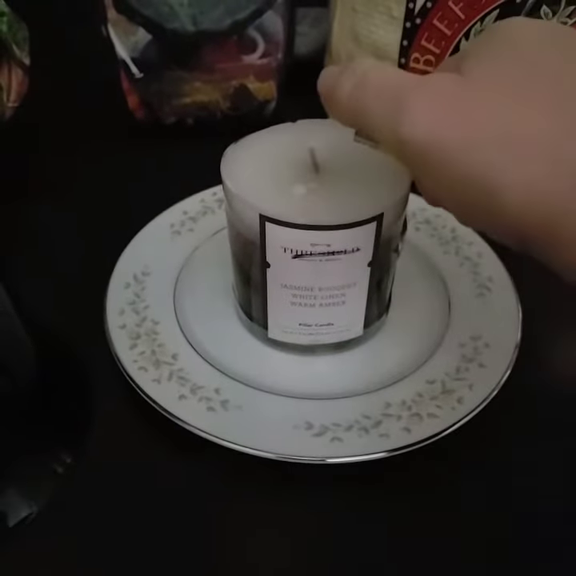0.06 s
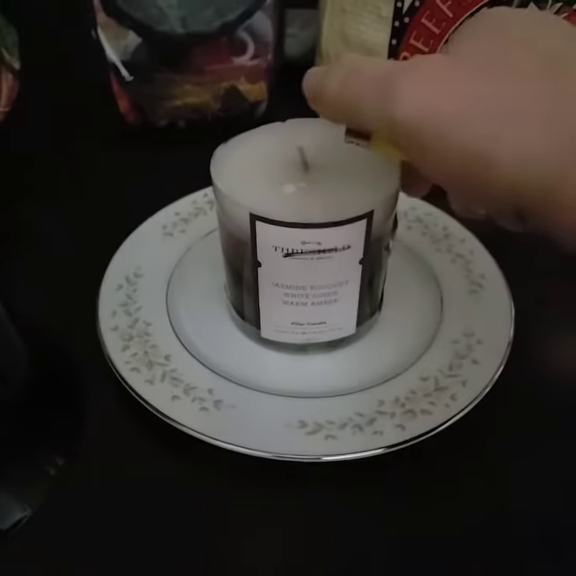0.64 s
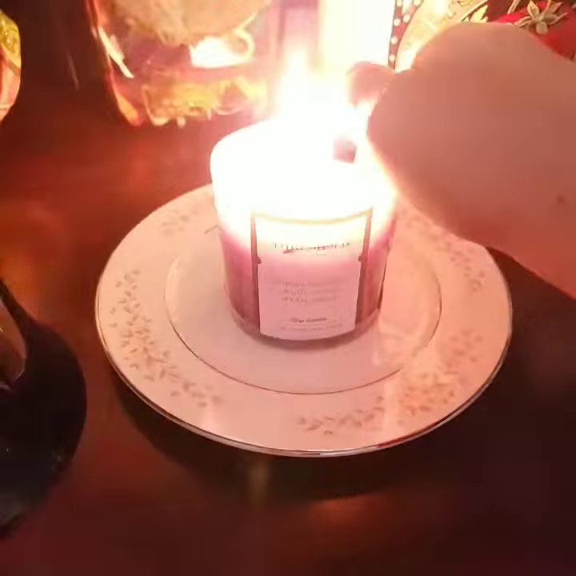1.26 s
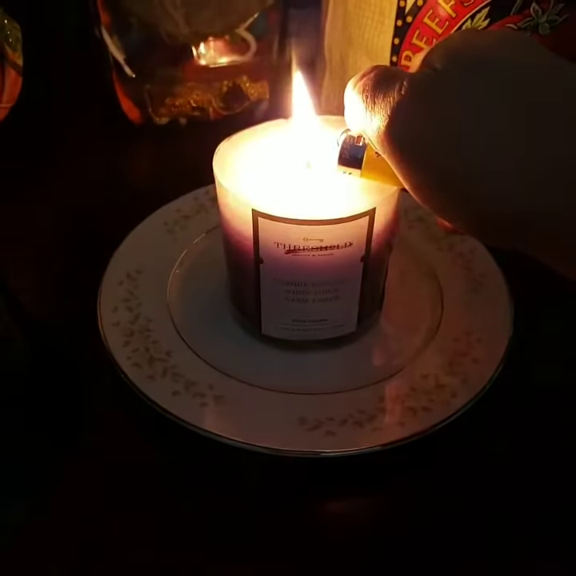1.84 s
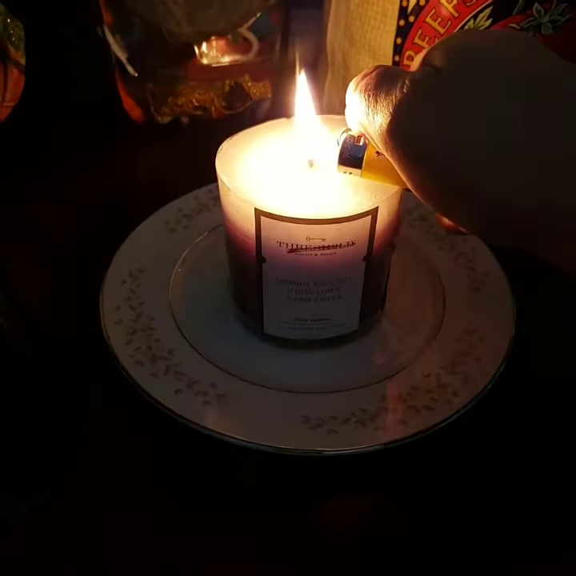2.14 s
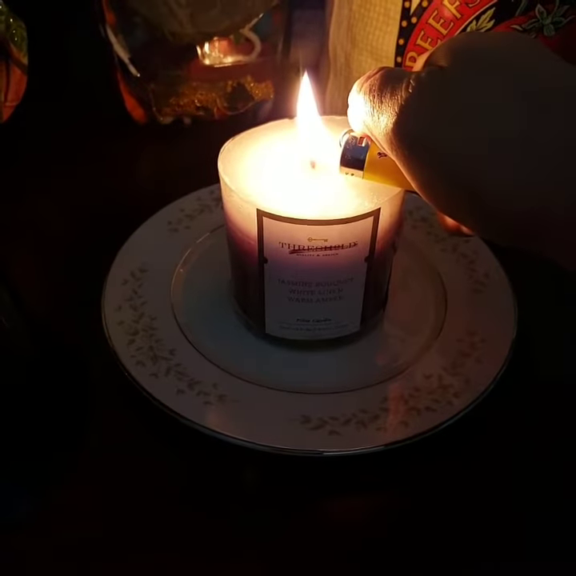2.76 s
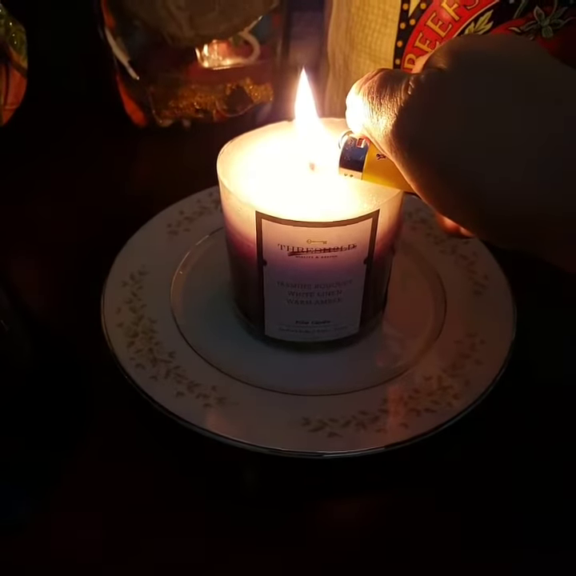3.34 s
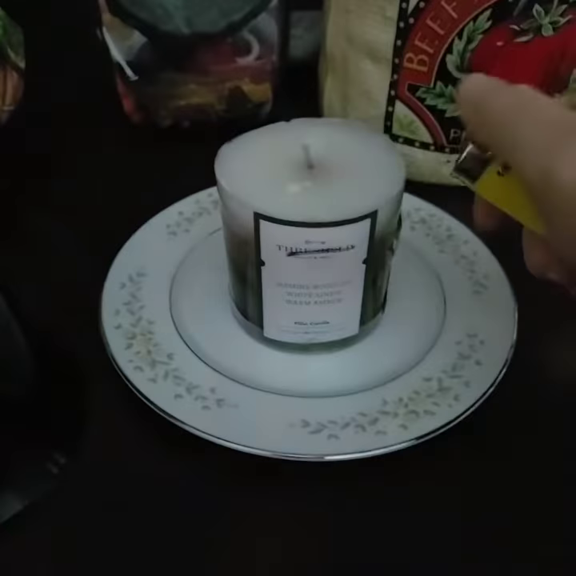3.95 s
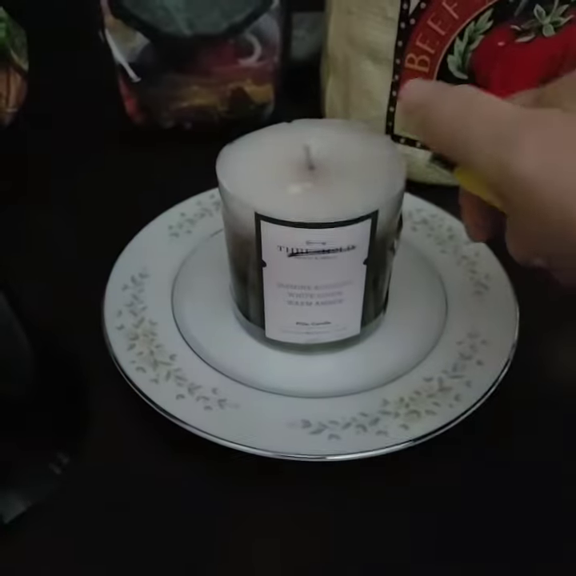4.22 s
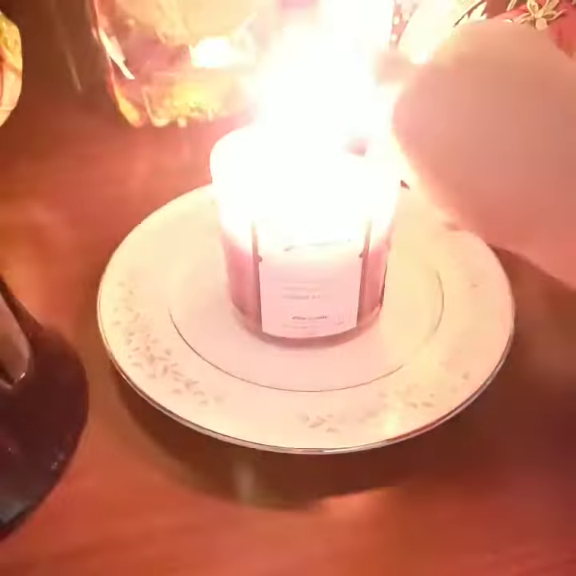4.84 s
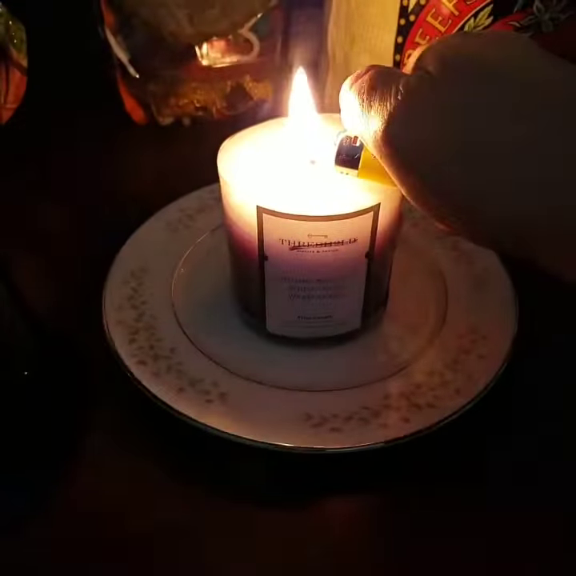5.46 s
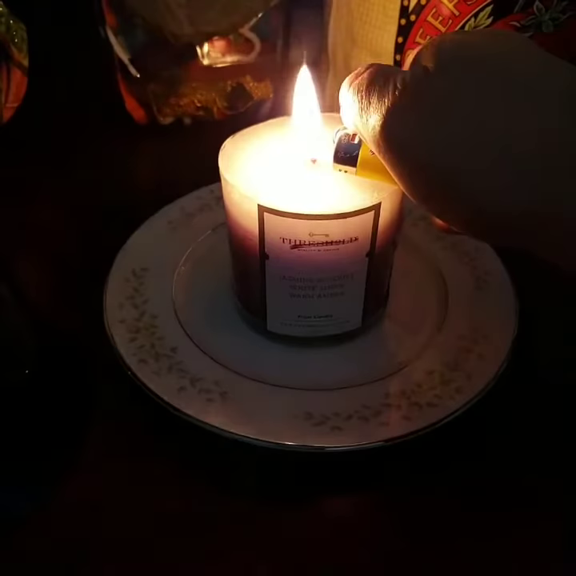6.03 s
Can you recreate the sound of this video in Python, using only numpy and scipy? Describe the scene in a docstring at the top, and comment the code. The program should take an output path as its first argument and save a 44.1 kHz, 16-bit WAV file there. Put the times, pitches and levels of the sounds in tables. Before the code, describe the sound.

A disposable lighter is struck twice up close, each short, sharp rasp followed by a faint gas hiss in a quiet room.

```python
"""In a small, quiet room, a disposable flint lighter is struck twice over a candle, close to a phone.
The wheel grinds on the flint and rings the metal hood, the thumb lands on the gas lever,
gas hisses and whistles from the nozzle, and the young flame flutters.
A low hum wavers underneath, and the left microphone hisses in its port resonance."""
import sys
import numpy as np
from scipy import signal
from scipy.fft import rfft, irfft, next_fast_len
from scipy.io import wavfile
from scipy.ndimage import uniform_filter1d

SR = 44100
rng = np.random.default_rng(int(sys.argv[2]) if len(sys.argv) > 2 else 0)


def wav_record(signal):
    """Record a signal, one row per channel, as 16-bit PCM in the file named by sys.argv[1]."""
    frames = np.transpose(np.atleast_2d(signal))
    bounded = np.clip(frames, -1, 1)
    # unit amplitude maps onto the largest positive 16-bit level
    quanta = np.round(bounded * 32767).astype(np.int16)
    wavfile.write(sys.argv[1], SR, quanta)


N = 268392
TIME = np.arange(N) / SR

# single snaps of wheel and lever: t/s, relative level/dB
SNAPS = [(0.335, -50), (0.348, -56), (0.884, -55), (0.939, -59), (1.061, -35), (1.078, -24.5),
         (1.183, -52.5), (1.213, -56), (1.26, -24), (1.294, -30), (1.338, -41), (1.345, -52),
         (2.365, -35.5), (3.588, -47), (3.624, -44.5), (4.803, -57.5), (5.101, -48), (5.136, -55),
         (5.205, -34.5), (5.963, -52), (6.05, -52)]
# thin, bright EQ of a snap: f/Hz, level/dB
SNAP_EQ = [(500, -2.5), (2000, -8), (4000, -12.5), (6500, 0), (16000, 5.5)]
# EQ of the slow rasp against the free spin: f/Hz, level/dB
RASP_EQ = [(1500, -4), (2800, 4), (4300, -4.5), (5600, 0), (8500, -2), (12000, 0), (16000, -0.5)]
# EQ of the left microphone against the right: f/Hz, level/dB
LEFT_EQ = [(100, -3.5), (700, -4.5), (1300, 6), (1800, 15), (2500, 5), (4000, 1.5), (5200, -8), (8000, -4),
           (11000, -9.5), (15000, -7.5)]

def wheel(snap_s=0.00059, snap_db=3, left_lag_samples=30):
    """Teeth tear grains off the flint: a gritty rasp when slow, a dense burst when fast, snaps on top."""
    rasp, spin = friction()
    speed = np.sqrt((rasp + spin) / np.max(rasp + spin))
    teeth_hz = (250 + 2200 * speed) * np.exp(.3 * drift(500))
    tooth_phase = np.cumsum(teeth_hz) / SR % 1
    grains = rng.standard_normal(N) * np.exp(-1.3 * tooth_phase) * undb(1.5 * drift(5000))
    grit = unit(grains) * undb(2.2 * drift(300))
    blur = unit(rng.standard_normal(N) * np.exp(-.7 * tooth_phase))
    snap_envelope = sum(undb(db + snap_db) * gate(t, t, .0001, snap_s) for t, db in SNAPS)
    snaps = colour(snap_envelope * rng.standard_normal(N), SNAP_EQ)
    right = hood(colour(rasp * grit, RASP_EQ) + spin * blur + snaps)
    # the left microphone lies further off, at the other end of the phone
    left = colour(np.roll(right, left_lag_samples), LEFT_EQ)
    return np.array([room(left, near_db=-2.5, tail_db=-8.0), room(right, near_db=-10.5, tail_db=-14.5)])


# the thumb feels for grip and nudges the wheel: start t/s, end t/s, level reached/dB
GRIP_RUBS = [(0.341, 0.379, -67), (.893, 0.943, -53.5), (0.947, 0.988, -59.5), (1.007, 1.078, -47),
             (1.202, 1.227, -46), (3.563, 3.61, -63), (5.101, 5.14, -67.5), (5.949, 5.981, -67.5)]
# the thumb strikes the wheel: grip t/s, slip t/s, grip level/dB, spin level/dB, spin half length/s
WHEEL_STRIKES = [(1.239, 1.273, -41, -17.5, .0062), (4.858, 4.928, -54.5, -13.5, .003)]

def friction(swell_db=12.5, slip_db=-30.5, coast_s=.02, tail_db=-7, tail_s=.008):
    """Rasp and spin envelopes: rubs swell and let go; a strike builds, slips and coasts to rest."""
    rasp, spin = np.zeros((2, N))
    for start, end, db in GRIP_RUBS:
        swell = undb(db + np.interp(TIME, [start, end], [-swell_db, 0]))
        rasp += swell * gate(start, end, 0.0065, .011)
    for grip, slip, grip_db, spin_db, spin_s in WHEEL_STRIKES:
        build = undb(np.interp(TIME, [grip, slip], [grip_db, slip_db]))
        rasp += build * gate(grip, slip, .001, coast_s)
        burst = np.exp(-.5 * ((TIME - slip) / spin_s) ** 2)
        tail = undb(tail_db) * gate(slip, slip, .001, tail_s)
        spin += undb(spin_db) * np.maximum(burst, tail)
    return rasp, spin


# metallic rings of hood and wheel: f/Hz, width/Hz, level/dB
HOOD_MODES = [(2660, 74, -5.5), (4800, 470, -6), (5940, 80, 1.5), (6280, 36, -6.5), (6530, 50, -2),
              (7800, 92, 10), (9530, 130, 0), (11100, 210, -0.5), (11740, 190, 0), (12300, 45, 2),
              (13260, 200, -1), (13800, 310, -2), (14000, 72, 3.5), (14700, 50, -0.5)]
# EQ of the grinding flint: f/Hz, level/dB
FLINT_EQ = [(100, -25), (400, -18), (750, -17), (1400, -21.5), (2300, -11), (3200, -4.5), (4000, -9),
            (5000, -0.5), (6200, -4), (7000, -4), (9200, -6), (11000, -1.5), (13500, 1.5), (16000, 0)]

def hood(contact):
    """The bare contact noise plus the ringing it excites in the metal parts."""
    impulse = signal.unit_impulse(N)
    rings = sum(undb(db) * signal.lfilter(*signal.iirpeak(hz, hz / width, fs=SR), impulse)
                for hz, width, db in HOOD_MODES)
    response = colour(impulse + rings, FLINT_EQ)[:SR // 5]
    return signal.fftconvolve(contact, response / np.linalg.norm(response))[:N]


# the thumb lands on the lever and jolts the case: t/s, level/dB, decay/s
THUDS = [(1.078, -60.5, 0.01), (1.27, -49.5, 0.013), (1.288, -36, 0.017), (2.366, -57, 0.016),
         (4.929, -48.5, 0.03), (4.948, -49.5, 0.015)]
# dull EQ of the plastic case: f/Hz, level/dB
CASE_EQ = [(30, -12), (70, -1.5), (125, 4.5), (180, -0.5), (310, -6), (400, -15.5), (470, -6.5), (560, -15),
           (750, -24), (1500, -33), (4000, -54.5)]
# the body knocks in the hand: t/s, level/dB, f/Hz, decay/s
CASE_KNOCKS = [(0.906, -66, 850, 0.036), (1.078, -55, 1360, 0.0079), (1.292, -34.5, 1915, 0.0046),
               (2.363, -61, 880, 0.0056), (2.366, -63, 2900, 0.0035), (3.586, -57, 2770, 0.0063),
               (4.928, -53, 1900, 0.0038)]

def thumb(knock_q=2.5):
    """Dull thuds and small hollow knocks of the case, damped by the hand."""
    thud_envelope = sum(undb(db) * gate(t, t, 0.0025, decay) for t, db, decay in THUDS)
    knocks = 0
    for t, db, hz, decay in CASE_KNOCKS:
        knocks += undb(db) * gate(t, t, 0.0014, decay) * band_noise(hz, hz / knock_q, order=2)
    return pan(thud_envelope * noise(CASE_EQ), left_db=3.0) + pan(knocks, left_db=2.5)


# flutters of the young flame: t/s, length/s, level/dB, rush against flutter/dB
FLAME_FLUTTERS = [(1.386, 0.063, -60, -20), (1.522, 0.11, -61.5, 6), (1.733, 0.045, -55.5, -35),
                  (5.155, 0.068, -67.5, -9), (5.476, 0.032, -68, -26)]
# EQ of the low flutter: f/Hz, level/dB
FLUTTER_EQ = [(100, -36), (170, -10), (235, 2.5), (285, 0.5), (350, -5), (520, -4.5), (700, -15.5),
              (950, -29), (2000, -49)]
# EQ of the airy rush: f/Hz, level/dB
RUSH_EQ = [(200, -21), (450, 3), (900, -5), (1600, -3), (3000, -12.5), (5000, -13.5), (8000, -21.5),
           (15000, -31)]

def flame():
    """The flame flutters in short, low puffs; one opens into a broad rush."""
    flutter, rush = noise(FLUTTER_EQ), noise(RUSH_EQ)
    puffs = 0
    for t, length, db, rush_db in FLAME_FLUTTERS:
        envelope = undb(db) * gate(t, t + length / 2, 0.0052, length / 2)
        puffs += envelope * (flutter + undb(rush_db) * rush)
    return np.array([room(side, near_db=-3.5, tail_db=-4.5) for side in pan(puffs, left_db=0.5)])


# gas valve held open: start t/s, end t/s, level/dB
VALVE_OPEN = [(1.29, 3.6, -65), (4.943, 6.2, -68.5)]
# EQ of the gas hiss: f/Hz, level/dB
JET_EQ = [(1500, -32.5), (2300, -10.5), (2900, -11), (3300, -27.5), (6000, -32), (7100, -13), (8000, -17.5),
          (9000, -13), (10500, -18), (12300, -14.5), (14300, -5.5), (15100, -7.5), (15700, -0.5)]
# thin whistles of hood cavity and nozzle: start t/s, end t/s, f/Hz, width/Hz, level/dB
JET_WHISTLES = [(1.29, 3.59, 2810, 200, -77.5), (1.287, 3.59, 15660, 295.2, -70.5),
                (4.939, 6.2, 2844, 200, -78.5), (4.94, 6.2, 9320, 447, -82),
                (4.935, 6.2, 13990, 396, -78.5), (4.943, 6.2, 15650, 350, -69)]

def gas(hiss_waver_db=0.3, whistle_waver_db=1.3):
    """The jet hisses and whistles while the lever is held; each whistle wavers by itself."""
    flow = sum(undb(db) * gate(start, end, .01, .01) for start, end, db in VALVE_OPEN)
    jet = flow * undb(hiss_waver_db * drift(5.8)) * np.array([noise(JET_EQ), noise(JET_EQ)])
    for start, end, hz, width, db in JET_WHISTLES:
        whistle = band_noise(hz, width, order=1, shape=(2, N))
        jet += undb(db + whistle_waver_db * drift(7)) * gate(start, end, .01, .01) * whistle
    return pan(jet, left_db=2)


# slow fader ride of the hum: t/s, relative level/dB
HUM_RIDE = [(0.0, -61), (0.12, -70), (0.44, -58), (0.62, -74.5), (0.9, -60), (1.66, -54), (1.72, -63.5),
            (2.76, -60), (2.84, -74), (3.16, -61.5), (3.259, -71.5), (3.54, -55), (4.44, -68), (4.52, -76),
            (4.74, -67.5), (5.16, -74), (5.26, -61), (6.08, -63)]
# EQ of the low rumble: f/Hz, level/dB
RUMBLE_EQ = [(20, -18), (40, -2.5), (65, 8.5), (110, -1.5), (160, -10.5), (210, -10.5), (400, -21),
             (700, -31), (1500, -28), (5000, -54)]

def hum(hz=58.06, trim_db=-2.5, octave_db=-73, rumble_db=-67, waver_db=1.13, follow=0.3):
    """A low, wavering hum; its octave and a bed of rumble swell gently with it."""
    ride_db = np.interp(TIME, *np.transpose(HUM_RIDE))
    phase = 2 * np.pi * hz * TIME + .35 * drift(8)
    fundamental = undb(ride_db + trim_db + waver_db * drift(11)) * unit(np.sin(phase))
    octave = undb(octave_db + waver_db * drift(11)) * unit(np.sin(2 * phase))
    swell = undb(follow * (ride_db - ride_db.mean()) + 1.5 * drift(4))
    rumble = undb(rumble_db) * noise(RUMBLE_EQ)
    return pan(fundamental + swell * (octave + rumble), left_db=4.5)


# EQ of each microphone's own hiss: f/Hz, level/dB
HISS_EQ = [(100, 6), (700, 5), (1500, -0.5), (4000, -3), (6000, -6), (7000, -8), (9000, -11.5),
           (12000, -0.5), (16000, -5)]
# EQ of the left port's resonance: f/Hz, level/dB
PORT_EQ = [(500, -43), (1000, -29), (1400, -17), (1750, -7), (2150, -2.5), (2500, -6), (3000, -20.5),
           (4000, -28.5), (6000, -43.5), (7200, -36), (8500, -47.5), (15000, -37.5)]

def microphone_hiss(hiss_db=-78, rumble_db=-79, port_db=-57):
    """Each microphone has its own faint noise floor; the left also hisses in its port resonance."""
    floor = np.array([undb(hiss_db) * noise(HISS_EQ) + undb(rumble_db) * noise(RUMBLE_EQ)
                      for _ in range(2)])
    floor[0] += undb(port_db + 0.38 * drift(4.1)) * noise(PORT_EQ)
    return floor


def room(x, near_db, tail_db, near_s=0.0024, t60=.18):
    """Quick reflections off plate, glass and table, then the short tail of the room."""
    t = TIME[:SR // 2]
    near, tail = rng.standard_normal((2, len(t))) * (t > .001)  # 1 ms pre-delay
    near = near * np.exp(-t / near_s)
    tail = tail * undb(-60 * t / t60) * (1 - np.exp(-t / 0.0016))
    response = undb(near_db) * near / np.linalg.norm(near) + undb(tail_db) * tail / np.linalg.norm(tail)
    return x + signal.fftconvolve(x, response)[:N]


def undb(db):
    """Decibels to gain."""
    return 10 ** (np.asarray(db) / 20)


def unit(x):
    """Scale to rms 1."""
    return x / np.sqrt(np.mean(x ** 2))


def colour(x, eq):
    """Minimum-phase EQ through points of f/Hz, level/dB."""
    hz, db = np.transpose(eq)
    size = next_fast_len(N + 8192, real=True)
    size += size % 2
    freq = np.maximum(np.fft.rfftfreq(size, 1 / SR), 1)
    gain = undb(np.interp(np.log(freq), np.log(hz), db))
    cepstrum = irfft(np.log(gain))
    cepstrum[1:size // 2] *= 2
    cepstrum[size // 2 + 1:] = 0
    return irfft(rfft(x, size) * np.exp(rfft(cepstrum)))[:N]


def noise(eq):
    """Coloured noise of rms 1."""
    return unit(colour(rng.standard_normal(N), eq))


def band_noise(hz, width, order, shape=N):
    """A noise band of rms 1 around hz."""
    band = signal.butter(order, [hz - width / 2, hz + width / 2], "bandpass", fs=SR, output="sos")
    return unit(signal.sosfilt(band, rng.standard_normal(shape)))


def drift(rate_hz):
    """Smooth random modulation of rms 1."""
    hold = int(SR / rate_hz)
    steps = np.repeat(rng.standard_normal(N // hold + 1), hold)
    return unit(uniform_filter1d(uniform_filter1d(steps, hold), hold)[:N])


def gate(start, end, attack, release):
    """Envelope that opens at start and dies away after end; times in seconds."""
    envelope = np.zeros(N)
    on = slice(int(start * SR) + 1, int((end + 10 * release) * SR))
    rise = 1 - np.exp(-(TIME[on] - start) / attack)
    envelope[on] = rise * np.exp(-np.maximum(TIME[on] - end, 0) / release)
    return envelope


def pan(x, left_db):
    """Stereo placement, the left side louder by left_db."""
    return x * undb(np.array([[left_db], [-left_db]]) / 2)


def scene():
    """The lighter and its flame up front, hum and hiss behind."""
    return wheel() + thumb() + flame() + gas() + hum() + microphone_hiss()


def record(dry, top_hz=15850):
    """The phone cuts the top with a steep low-pass."""
    return signal.sosfilt(signal.ellip(12, .1, 80, top_hz, fs=SR, output="sos"), dry)


dry = scene()
out = record(dry)
wav_record(out)
```